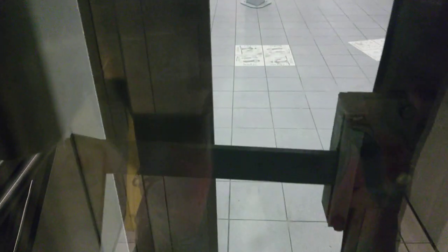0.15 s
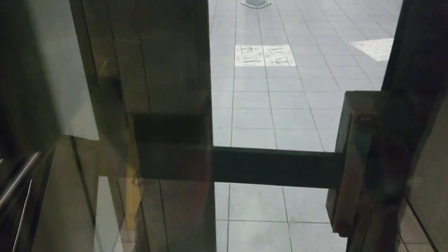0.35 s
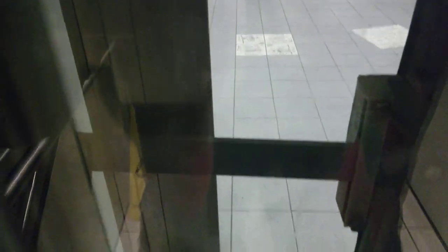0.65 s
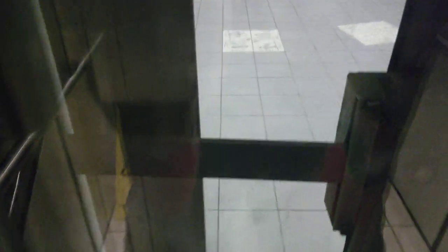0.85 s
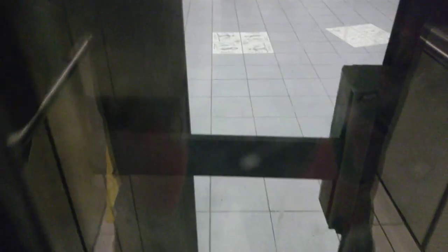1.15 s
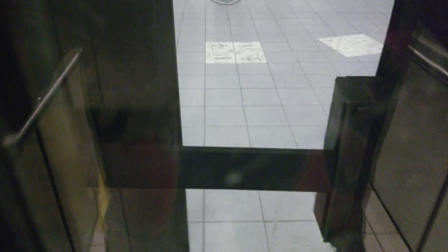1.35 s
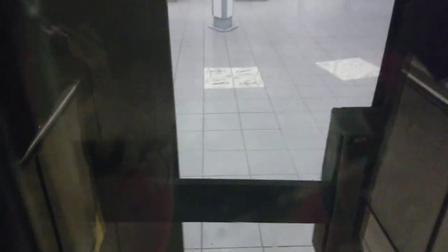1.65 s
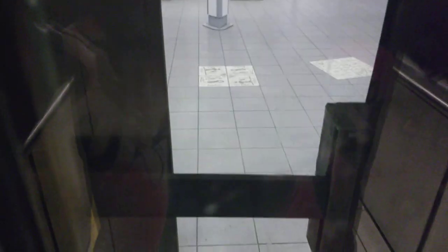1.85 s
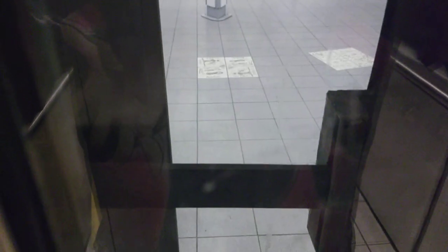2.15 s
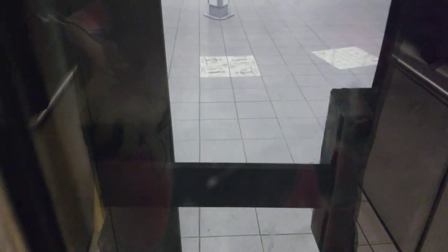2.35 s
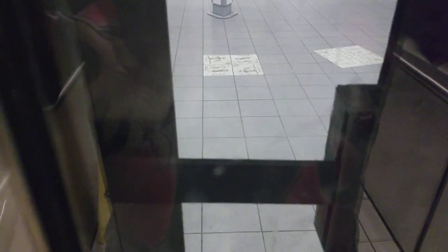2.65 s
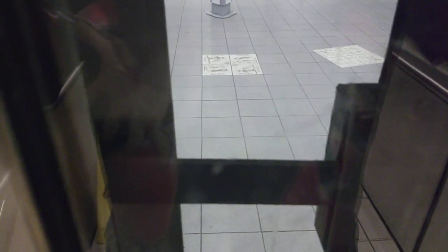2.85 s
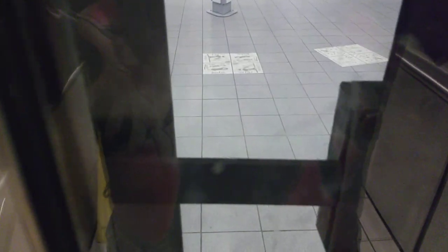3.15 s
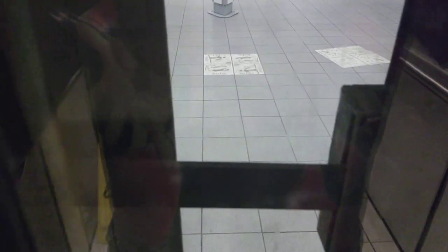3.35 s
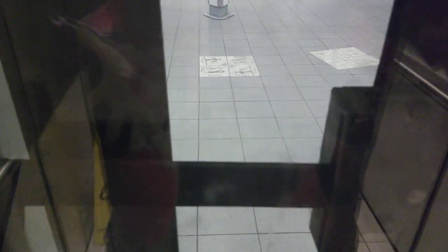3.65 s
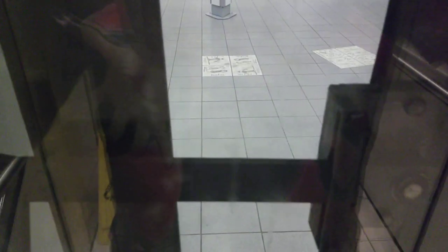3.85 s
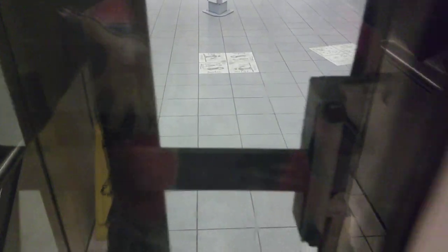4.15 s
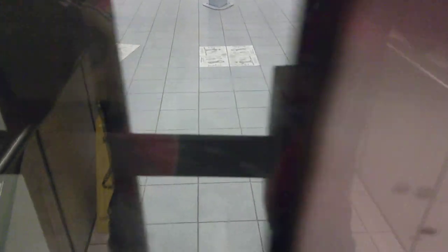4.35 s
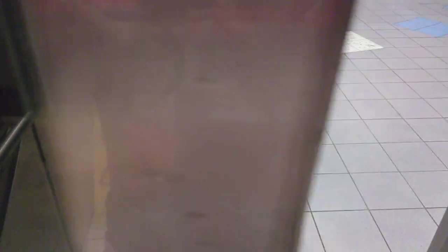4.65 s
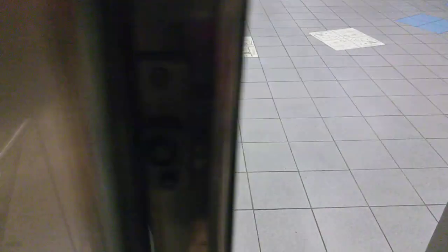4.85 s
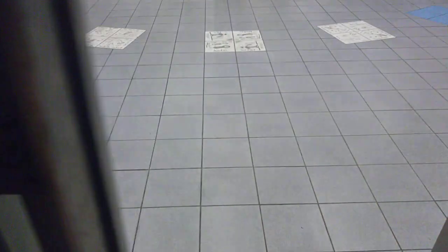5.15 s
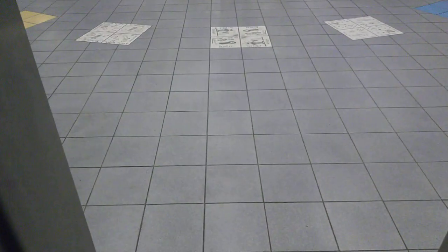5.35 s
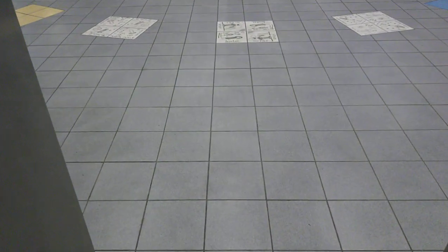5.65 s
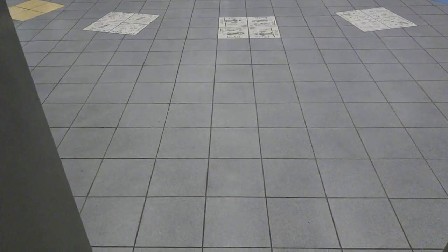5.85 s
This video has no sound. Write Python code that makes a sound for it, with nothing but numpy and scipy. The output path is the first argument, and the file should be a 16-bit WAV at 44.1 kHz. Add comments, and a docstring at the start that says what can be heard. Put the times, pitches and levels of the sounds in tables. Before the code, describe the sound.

An elevator cab rumbles to a halt with a heavy steel clunk, then its doors unlatch and roll open, squealing.

```python
"""An inclined elevator creeps into its station, heard inside the small steel and glass cab.
Over rumble and machinery hum, steel parts meet in a heavy clunk; loose panels rattle as the cab
settles and the wheel scuff dies away. From 3.3 s the door linkage creaks; at 4.15 s the latch snaps
open and the doors roll aside on guides that stick, slip and squeal. The door motor's gear tone
sounds briefly, the drive whine swells, and the doors slow down."""
import sys
import numpy as np
from scipy import signal
from scipy.io import wavfile

SR = 44100
rng = np.random.default_rng(int(sys.argv[2]) if len(sys.argv) > 2 else 0)


def wav_out(sig):
    """Save sig, one row per channel (or a flat mono array), as 16-bit PCM at SR to the path in sys.argv[1]."""
    wavfile.write(sys.argv[1], SR, np.round(np.clip(np.atleast_2d(sig).T, -1, 1) * 32767).astype(np.int16))


N = 265041
TIME = np.arange(N) / SR
CUTOFF_HZ = 14400


def clunk():
    """Heavy steel parts meet at several points in turn; the last contact bounces on, ever weaker."""
    # (time [s], level [dB])
    contacts = [(.082, -28), (.087, -17), (.102, -20.5), (.119, -16.5), (.135, -22.5)]
    # (frequency [Hz], relative density [dB])
    spectrum = [(150, -43), (280, -9), (450, -15), (640, -6.5), (850, -16), (1300, -8), (1900, -1),
                (2600, -7), (3400, -19.5), (5000, -9), (7000, -18.5), (9000, -24.5), (14000, -24.5)]
    # (frequency [Hz], width [Hz], gain [dB])
    steel_modes = [(645, 27, 15.5), (1047, 48, 12), (1294, 78, 9), (1718, 48, 12.5), (1760, 30, 2.5),
                   (2017, 8.7, 11), (2080, 27, 7.5), (2390, 63, 7.5), (2625, 11, 12), (3095, 42, 8.5),
                   (4110, 44, 10)]
    bounce_s, bounce_loss_db, points = .03, 5.5, 6
    last_s, last_db = contacts[-1]
    blows = contacts + [(last_s + k * bounce_s, last_db - k * bounce_loss_db) for k in range(1, 5)]
    out = np.zeros((2, N))
    for k in range(points):
        ring = panel_ring(spectrum, steel_modes, t60_s=.063, tail_t60_s=.75, tail_db=-.5, build_s=.0024)
        out += strike(blows[k::points], ring)
    return out


def latch():
    """The door lock snaps back, bounces and meets its stop, ringing latch and door panel."""
    # (time [s], level [dB])
    blows = [(4.154, -16.5), (4.158, -27.5), (4.177, -24.5), (4.413, -33.5)]
    # (frequency [Hz], relative density [dB])
    spectrum = [(150, -18.5), (340, -1.5), (500, -5), (850, -8.5), (1150, -7.5), (1500, -3.5), (2300, -4.5),
                (3200, -13), (4300, -19.5), (6300, -7), (9000, -15.5), (14000, -19.5)]
    # (frequency [Hz], width [Hz], gain [dB])
    modes = [(338, 22, 7), (404, 24, 4), (1060, 60, 3), (1392, 32, 11.5), (1610, 22, 10), (2060, 45, 4),
             (2353, 30, 8), (2445, 24, 9.5), (3050, 40, 4), (3690, 36, 11), (5370, 70, 5), (6480, 70, 4)]
    out = np.zeros((2, N))
    for k in range(2):
        ring = panel_ring(spectrum, modes, t60_s=.28, tail_t60_s=.75, tail_db=-7, build_s=.00041)
        out += strike(blows[k::2], ring)
    return out


def doors():
    """Rollers rumble with door speed; the guides rub grittily in the sill and bind here and there."""
    # both: (frequency [Hz], relative density [dB])
    roller_spectrum = [(200, -25), (380, 9.5), (550, 1), (800, 7.5), (1200, 4.5), (1900, 6), (2500, 3),
                       (3300, -38), (5000, 0)]
    guide_spectrum = [(1800, -24), (3200, -17), (4600, 5), (6000, 11), (7200, 6.5), (9500, 8.5),
                      (14000, 0.5)]
    # (start [s], length [s], level [dB])
    binds = [(3.64, 0.5, -54), (4.385, 0.33, -47), (4.809, 0.37, -38.5), (5.357, 0.16, -38),
             (5.649, .22, -40)]
    start_s, stop_s, speed_up_s = 4.15, 6.454, .082
    rollers_db, guides_db, linkage_db = -37, -48, -47.5
    speed = held(start_s, stop_s, speed_up_s, fall_s=1)
    # the door drive turns before the lock lets go
    linkage = held(3.28, start_s + speed_up_s, rise_s=.14, fall_s=speed_up_s)
    binding = sum(from_db(db) * swell(s, length_s, rise_share=.33) for s, length_s, db in binds)
    rollers = grainy_noise(roller_spectrum, flutter_db=2.1, flutter_hz=10.8, grain_db=.97, grain_hz=34)
    guides = grainy_noise(guide_spectrum, flutter_db=-1.7, flutter_hz=32, grain_db=2.5, grain_hz=51)
    roller_gain = from_db(rollers_db) * speed + from_db(linkage_db) * linkage
    guide_gain = from_db(guides_db) * speed + binding
    return roller_gain * rollers + guide_gain * guides


def squeals():
    """The door linkage creaks, then dry guides stick and slip: gliding tones with overtones, rasping when the
    slips come unevenly."""
    # (start [s], length [s], first [Hz], last [Hz], level [dB], rasp [0-1],
    #  overtone slope [dB/octave], pan left [dB])
    glides = [(3.362, 0.081, 2365, 2290, -45.5, 0.94, -10.5, -3),
              (3.627, 0.29, 5980, 6120, -59, 0.47, -34, 3), (3.703, 0.31, 1966, 2035, -45, 0.45, -10, -3),
              (3.794, .11, 2070, 2004, -35, 0.46, -16.5, 0.5),
              (3.791, 0.096, 6100, 6090, -54.5, .8, -3, -1),
              (3.981, .11, 3280, 3130, -45.5, 0.28, -10, -2.5),
              (4.293, .115, 5730, 6400, -44, 0.5, -25.5, 3), (4.354, 0.12, 6980, 7200, -47, 0.77, -24, -4),
              (4.422, .135, 12000, 13360, -42.5, .8, -40, -2), (4.505, .18, 7890, 7530, -45, 0.2, -58, -2),
              (4.921, 0.14, 5644, 5570, -32, .25, -15.5, -2.5), (5.061, 0.13, 7520, 7290, -45.5, 1, -40, 3),
              (5.056, 0.079, 13900, 13500, -35.5, .7, -40, -4), (5.372, 0.093, 4900, 5750, -47, .95, 8, -1),
              (5.42, 0.074, 7460, 7400, -46.5, .8, -40, 2), (5.657, 0.128, 4390, 4500, -45, 0.6, -24, -2),
              (5.674, 0.045, 9070, 9100, -33.5, 0.86, -40, -4),
              (5.684, 0.094, 7150, 7270, -45.5, .4, -30, 9),
              (5.709, 0.16, 10400, 9840, -47.5, 0.9, -40, -3)]
    out = np.zeros((2, N))
    jitter = .022 * drift(500)
    scatter = (drift(220) + 1j * drift(270)) / np.sqrt(2)
    for start_s, length_s, first_hz, last_hz, db, rasp, slope_db, pan_db in glides:
        on = (TIME >= start_s) & (TIME < start_s + length_s)
        hz = np.interp(TIME[on] - start_s, [0, length_s], [first_hz, last_hz]) * (1 + rasp * jitter[on])
        phase = running_phase(hz)
        pressure = swell(start_s, length_s, rise_share=.31)[on] ** 1.36
        slips = np.sqrt(1 - rasp ** 2) + rasp * scatter[on]
        pan = from_db([[pan_db / 2], [-pan_db / 2]])
        for k in range(1, int(CUTOFF_HZ / first_hz) + 2):
            partial = np.real(slips * np.exp(1j * k * phase)) * (k * hz < SR / 2)
            out[:, on] += from_db(db + slope_db * np.log2(k)) * pressure * partial * pan
    return np.sqrt(2) * out


def knocks():
    """Loose panels and linkage knock: a thud in the floor, a clank in the panels, a tick in fittings."""
    # (time [s], thud [dB], clank [dB], tick [dB])
    blows = [(.345, -33.5, -38, -68), (.431, -49, -35, -44), (.462, -44, -32.5, -31),
             (.513, -38.5, -33, -42), (.536, -38, -32.5, -45), (.908, -44, -39.5, -62),
             (.95, -46, -43.5, -64), (1.277, -42, -46, -51), (3.332, -40.5, -42.5, -51),
             (3.457, -36.5, -42, -61), (3.643, -46, -43, -38), (4.051, -72, -52, -47.5),
             (4.377, -53, -37, -41), (4.414, -41, -27.5, -30.5), (4.655, -43.5, -30.5, -36.5),
             (5.145, -42, -36, -44), (5.212, -38.5, -36.5, -49), (5.603, -60, -60, -48.5),
             (5.842, -65, -44, -40.5)]
    # all three: (frequency [Hz], relative density [dB])
    floor = [(30, 0), (75, 5), (140, 0), (280, -11.5), (500, -9.5), (1000, -15), (2000, -62)]
    panels = [(150, -47), (400, 10.5), (650, -22), (1000, 5.5), (1500, 2), (2100, 7), (2600, -4.5),
              (3400, -6), (8000, -84)]
    fittings = [(1200, -34), (2500, 4), (3800, -5), (5000, 8), (7000, 8.5), (9000, -2.5), (14000, -1.5)]
    # both: (frequency [Hz], width [Hz], gain [dB])
    floor_modes = [(130, 21, -2.5), (144, 75, 8)]
    fitting_modes = [(2650, 120, 5), (3760, 190, 8), (5970, 81, -4.5)]
    times_s, *levels_db = np.transpose(blows + rattles())
    thud = panel_ring(floor, floor_modes, t60_s=.26, tail_t60_s=.52, tail_db=-24, build_s=.00055)
    clank = panel_ring(panels, modes=(), t60_s=.032, tail_t60_s=.36, tail_db=-3, build_s=.00048)
    tick = panel_ring(fittings, fitting_modes, t60_s=.13, tail_t60_s=.98, tail_db=-8.5, build_s=.00093)
    return sum(strike(zip(times_s, db), ring) for db, ring in zip(levels_db, (thud, clank, tick)))


def rattles():
    """Rows of light, uneven knocks as the cab settles and as the linkage takes up its slack."""
    # (start [s], end [s], thud [dB], clank [dB], tick [dB])
    spells = [(0.579, 1.25, -45.5, -68, -58), (3.378, 3.62, -57, -43, -52)]
    gap_s, spread_db = .045, 2.5
    rows = []
    for start_s, end_s, *levels_db in spells:
        chance = rng.standard_normal((40, 4))
        times_s = start_s + gap_s * (np.arange(len(chance)) + .25 * chance[:, 0])
        knocks_db = levels_db + spread_db * chance[:, 1:]
        rows += [(s, *db) for s, db in zip(times_s, knocks_db) if s < end_s]
    return rows


def door_motor():
    """The gear tone holds while the motor pulls and sinks as it eases off."""
    # (multiple of the gear tone, level [dB])
    harmonics = [(1, -3), (2, -9), (3, 0), (4, -9)]
    start_s, ease_s, end_s = 4.68, 4.83, 4.99
    gear_hz, sag_hz_per_s = 602, 490
    hz = gear_hz - sag_hz_per_s * (np.clip(TIME, ease_s, end_s) - ease_s)
    phase = running_phase(hz * (1 + .0079 * drift(34.4)))
    gain = from_db(-45.5) * held(start_s, end_s, rise_s=.08, fall_s=.17)
    return gain * sum(from_db(db) * np.sin(k * phase) for k, db in harmonics)


def ride():
    """Steady cab rumble; the wheels scuff on the rail, dying away as the cab slows."""
    # both: (frequency [Hz], relative density [dB])
    rumble_spectrum = [(22, -3.5), (45, -1), (80, -2), (130, -5.5), (200, -2), (280, -6.5), (420, -15.5),
                       (700, -10), (1000, -46.5), (1400, -21), (2000, -20), (3200, -49.5), (7000, -45),
                       (14000, -35)]
    scuff_spectrum = [(300, -6), (450, -1.5), (650, -1.5), (1000, -2.5), (1900, -6.5), (3300, -19),
                      (7000, -15), (14000, -37)]
    # (time [s], level [dB])
    scuff_curve = [(0, -49.5), (.4, -40), (.55, -33), (.74, -42.5), (1.3, -45.5), (1.7, -49.5), (3.2, -52),
                   (6, -57)]
    rumble_db, scuff_db = -43.5, np.interp(TIME, *np.transpose(scuff_curve))
    rumble = rms_one(banded_noise(rumble_spectrum, N, lambda hz: 1))
    scuff = grainy_noise(scuff_spectrum, flutter_db=3, flutter_hz=3.4, grain_db=.5, grain_hz=35)
    return from_db(rumble_db) * rumble + from_db(scuff_db) * scuff


def machinery_hum():
    """The machinery hums in lines, each part steady and part wavering."""
    # (frequency [Hz], level [dB], width [Hz])
    lines = [(79.7, -49, 5.8), (121, -52.5, 5.8), (150.4, -53.5, 6.23), (173, -56, 3.96),
             (266.9, -49, 6.33), (294.2, -49.5, 9.2), (723, -55.5, 4.5), (1927, -61, 6)]
    steady, waver, hum = .7, .5, 0
    for hz, db, width_hz in lines:
        phase = running_phase(hz + .3955 * width_hz * drift(5.84))
        in_phase = steady * np.sqrt(2) + waver * drift(width_hz)
        quadrature = waver * drift(width_hz)
        hum += from_db(db) * (in_phase * np.cos(phase) + quadrature * np.sin(phase))
    return hum


def drive_whine():
    """The drive's thin tone, louder in spells."""
    # (start [s], end [s], level [dB])
    spells = [(1.815, 2.474, -65.5), (2.623, 2.848, -71), (3.06, 3.3, -65), (5.005, 5.554, -53.5),
              (5.75, 6.1, -55)]
    whine_hz, idle_db, fade_s = 1115, -61.5, .093
    ear_phase_rad = np.array([[0], [.8]])
    phase = running_phase(whine_hz + 3.3 * drift(22.5))
    surges = sum(from_db(db) * held(start_s, end_s, fade_s, fade_s) for start_s, end_s, db in spells)
    return (from_db(idle_db) + surges) * np.sqrt(2) * np.sin(phase + ear_phase_rad)


def cab_reverb(x, t60_s, direct_db, wet_db):
    """Direct sound plus dense reflections from the hard walls, different at each ear."""
    t = TIME[:SR // 2]
    echoes = rms_one(rng.standard_normal((2, len(t))) * from_db(-60 * t / t60_s)) / np.sqrt(len(t))
    return from_db(direct_db) * x + from_db(wet_db) * signal.fftconvolve(x, echoes, axes=1)[:, :N]


def panel_ring(spectrum, modes, t60_s, tail_t60_s, tail_db, build_s):
    """One blow: crowded panel modes build up and die fast, the cab's tail follows; first 20 ms at rms 1."""
    # (frequency [Hz], factor on the tail's decay time)
    tail_stretch = [(100, .9), (600, 1.2), (2000, 1.0), (5000, .85), (12000, .65)]
    t = TIME[:SR * 3 // 4]
    build = 1 - np.exp(-t / build_s)
    early = from_db(-60 * t / t60_s)
    tail = lambda hz: from_db(tail_db - 60 * t / (tail_t60_s * at_hz(tail_stretch, hz)))
    ring = banded_noise(spectrum, len(t), lambda hz: build * (early + tail(hz)))
    for hz, width_hz, db in modes:
        resonance = signal.lfilter(*signal.iirpeak(hz, hz / width_hz, fs=SR), ring)
        ring = ring + (from_db(db) - 1) * resonance
    return ring / np.sqrt(np.mean(ring[:, :SR // 50] ** 2))


def strike(blows, ring):
    """Every blow (time [s], level [dB]) sets the same body ringing."""
    out = np.zeros((2, N))
    for s, db in blows:
        start = round(s * SR)
        out[:, start:start + ring.shape[1]] += from_db(db) * ring[:, :N - start]
    return out


def grainy_noise(spectrum, flutter_db, flutter_hz, grain_db, grain_hz):
    """Rolling or rubbing: bands flutter on their own, and surface grains jolt them all together."""
    bands = banded_noise(spectrum, N, lambda hz: from_db(flutter_db * drift(flutter_hz)))
    return rms_one(bands * from_db(grain_db * drift(grain_hz)))


def banded_noise(spectrum, size, envelope):
    """Stereo noise, alike in the bass and wide in the treble; envelope(hz) shapes each band."""
    # (frequency [Hz], left-right correlation)
    likeness = [(60, 0.97), (140, 0.89), (280, 0.84), (500, 0.78), (750, 0.55), (1100, -0.2), (1600, -0.05),
                (2300, 0.12), (4000, 0.03), (8000, -0.05)]
    out = np.zeros((2, size))
    edges_hz = np.geomspace(20, 16000, 25)
    white = rng.standard_normal((2, 2, size + 4000))
    for k, (low, high) in enumerate(zip(edges_hz, edges_hz[1:])):
        if spectrum[0][0] < high and low < spectrum[-1][0]:
            hz = np.sqrt(low * high)
            bandpass = signal.butter(2, [low, high], "band", fs=SR, output="sos")
            mid, side = signal.sosfilt(bandpass, white[k % 2])[:, -size:]
            alike = at_hz(likeness, hz)
            band = np.sqrt(1 + alike) * mid + np.sqrt(1 - alike) * side * [[1], [-1]]
            out += from_db(at_hz(spectrum, hz)) * envelope(hz) * band
    return out


def drift(rate_hz):
    """Smooth random wander at rms 1."""
    hop, warm_up = 20, 4000
    pole = np.exp(-2 * np.pi * rate_hz * hop / SR)
    white = rng.standard_normal(N // hop + warm_up + 2)
    slow = signal.lfilter([1], [1, -2 * pole, pole * pole], white)[warm_up:]
    return np.interp(np.arange(N) / hop, np.arange(len(slow)), rms_one(slow))


def held(start_s, end_s, rise_s, fall_s):
    """Envelope from 0 to 1: rise, hold, fall."""
    return np.clip(np.minimum((TIME - start_s) / rise_s, (end_s - TIME) / fall_s), 0, 1)


def swell(start_s, length_s, rise_share):
    """Triangular envelope."""
    return held(start_s, start_s + length_s, rise_share * length_s, (1 - rise_share) * length_s)


def at_hz(table, hz):
    """Read a table on a log-frequency axis."""
    table_hz, values = np.transpose(table)
    return np.interp(np.log(hz), np.log(table_hz), values)


def running_phase(hz):
    return 2 * np.pi * np.cumsum(hz) / SR


def from_db(db):
    return 10 ** (np.asarray(db) / 20)


def rms_one(x):
    return x / np.sqrt(np.mean(x ** 2) + 1e-20)


def scene():
    """The cab, its hardware and its doors."""
    tones = cab_reverb(squeals() + door_motor(), t60_s=.3, direct_db=2, wet_db=5)
    background = ride() + machinery_hum() + drive_whine()
    return clunk() + latch() + knocks() + doors() + tones + background


def record(dry):
    """The microphone's response steps down in the top octave; the very top is cut."""
    edge_hz, top_db = 7700, -15
    dull = signal.sosfiltfilt(signal.butter(16, edge_hz, fs=SR, output="sos"), dry)
    shelved = dull + from_db(top_db) * (dry - dull)
    return signal.sosfilt(signal.ellip(10, .2, 80, CUTOFF_HZ, fs=SR, output="sos"), shelved)


dry = scene()
out = record(dry)
wav_out(out)
```